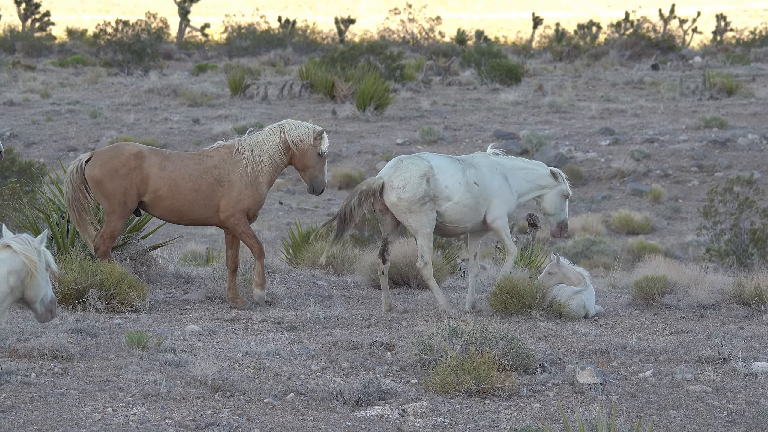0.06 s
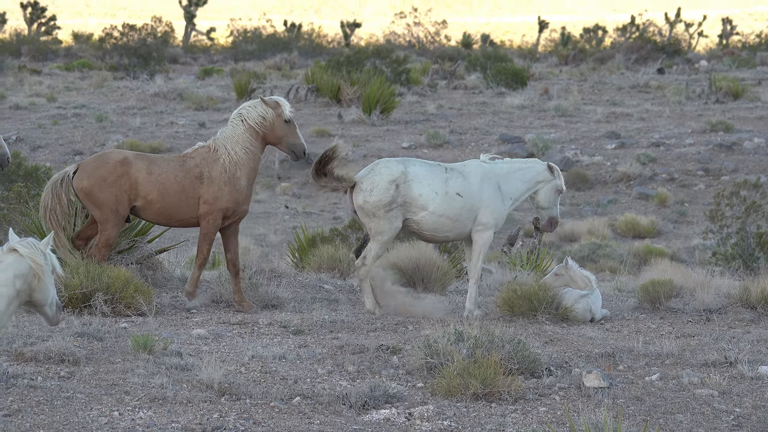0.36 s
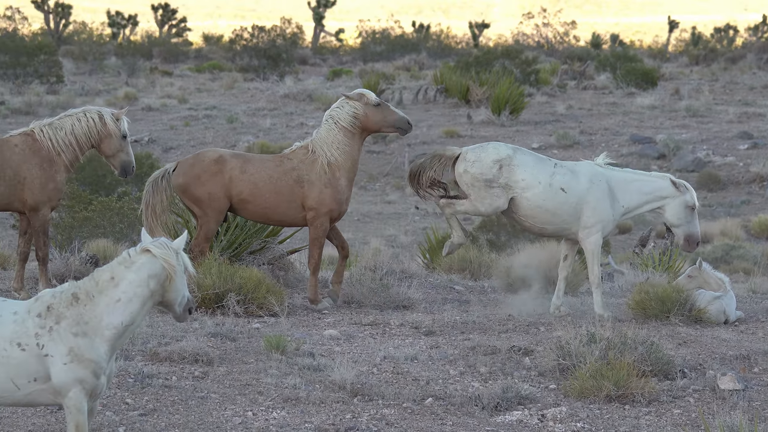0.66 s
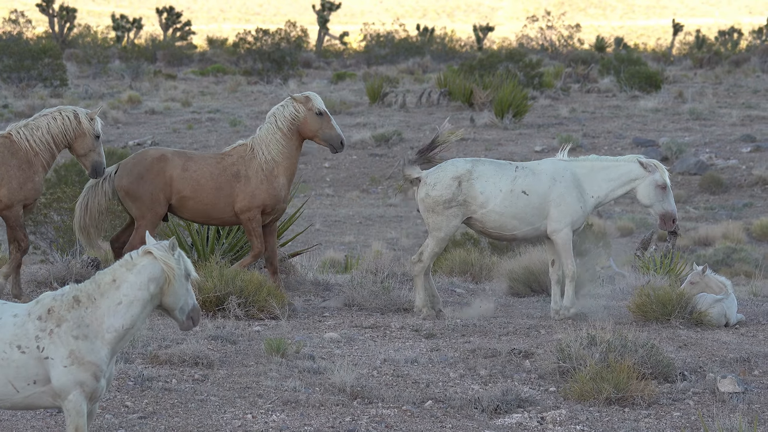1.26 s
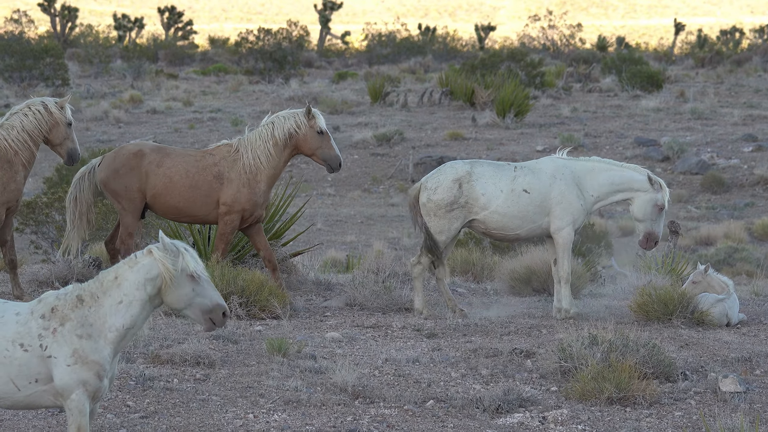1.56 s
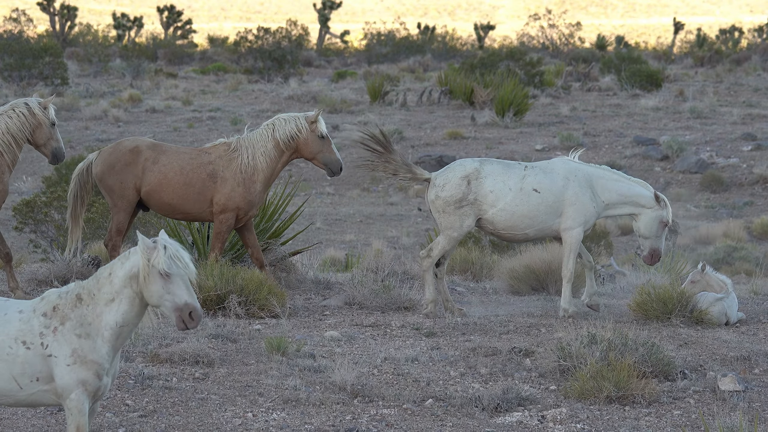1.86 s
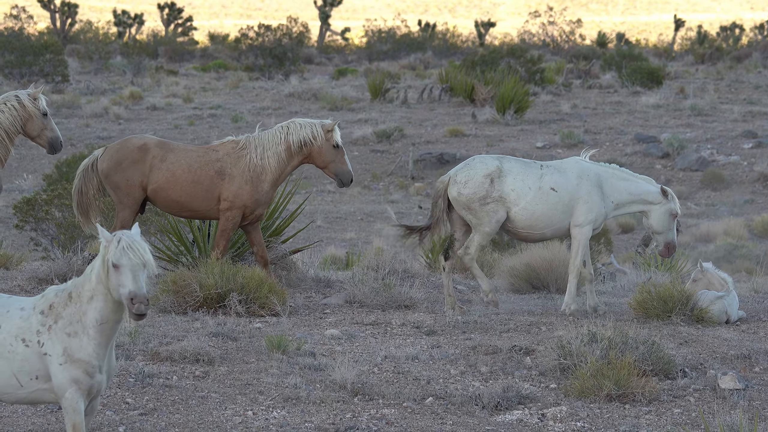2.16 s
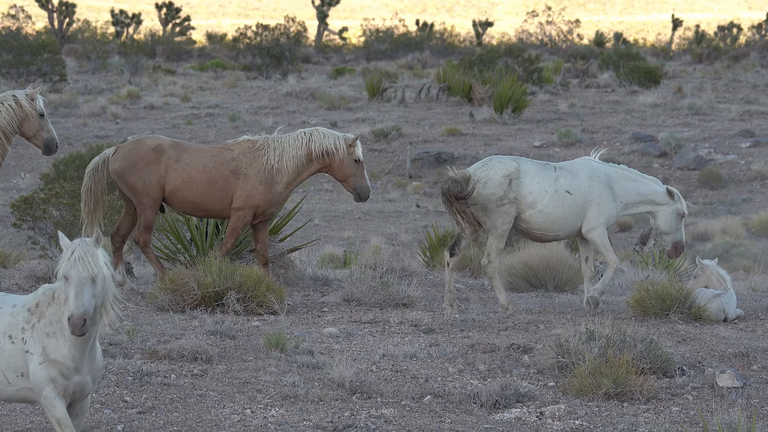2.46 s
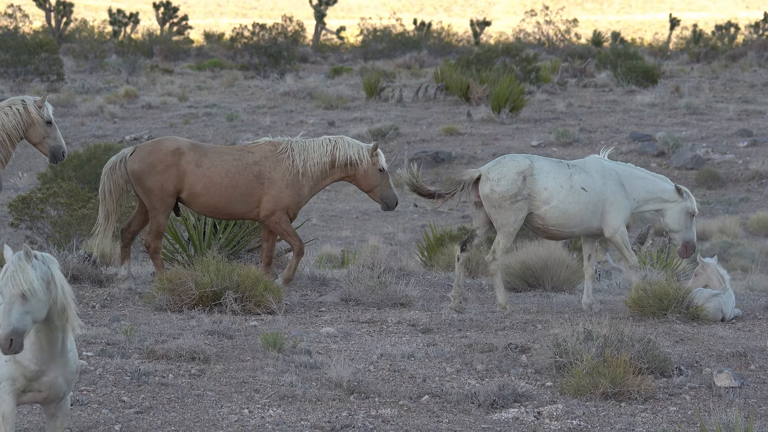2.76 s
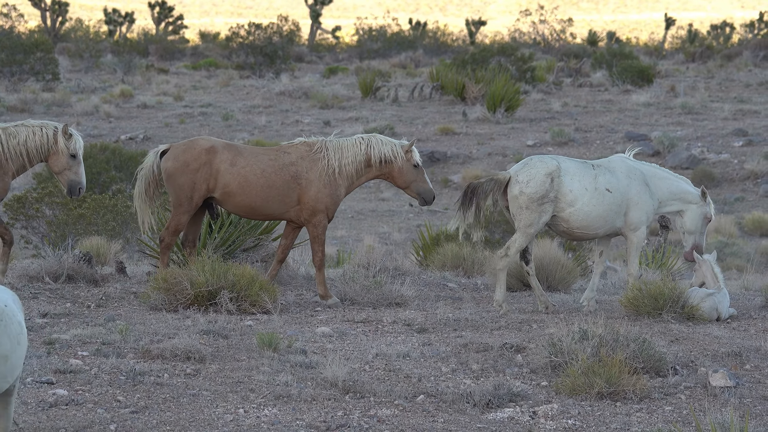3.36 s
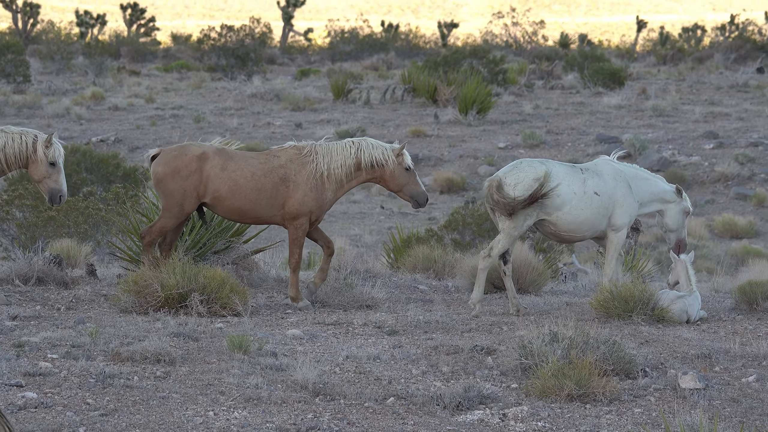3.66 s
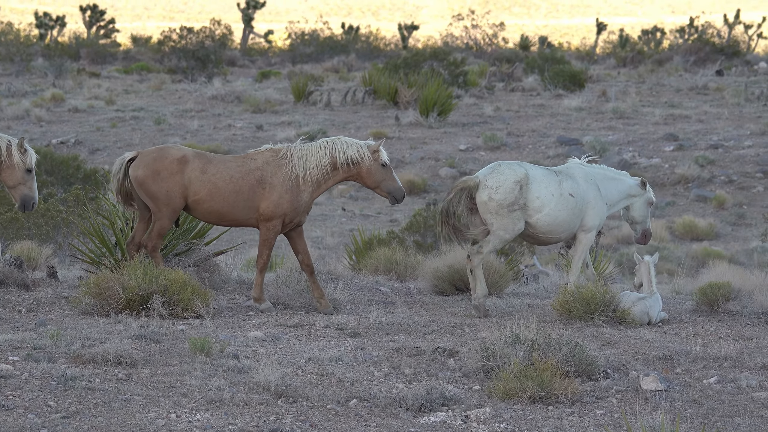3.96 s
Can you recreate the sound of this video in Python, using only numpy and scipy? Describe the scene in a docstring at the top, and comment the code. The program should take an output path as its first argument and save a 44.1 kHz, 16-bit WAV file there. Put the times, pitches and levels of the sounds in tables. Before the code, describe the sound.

A horse's wavering, raspy squeal outdoors, with wind buffeting the microphone and faint hoof scuffs.

```python
"""Open desert, a stereo microphone in the wind; some way off, a horse kicks out at another and squeals.
The squeal starts as a thin whistle, breaks into a harsh rasp as fluttering breath rings the throat,
swoops three times and drops away. Right at the microphone, eddies of wind thump across the ports.
Hooves scuff the gravel faintly over a low rumble and a fading hiss."""
import sys
import numpy as np
from scipy import signal
from scipy.fft import rfft, irfft
from scipy.io import wavfile
from scipy.ndimage import uniform_filter1d, map_coordinates

SR = 44100
rng = np.random.default_rng(int(sys.argv[2]) if len(sys.argv) > 2 else 0)


def waveform_to_disk(signal):
    """Save audio, clipped to [-1, 1], as 16-bit WAV at the path in sys.argv[1]."""
    frames = np.transpose(np.atleast_2d(signal))
    scaled = np.clip(frames, -1, 1) * 32767
    samples = np.round(scaled).astype(np.int16)
    wavfile.write(sys.argv[1], SR, samples)


N = 176400  # 4 s

# Eddies passing the microphone. Each row: time in seconds, delay of the left port and lead of the
# right in seconds taken together, pitch of the small eddies in Hz.
EDDY_PASSAGE = [(0, 0.00038, 176), (1.4, 0.00036, 171), (1.799, 0.00042, 265), (2.9, 0.00033, 274),
                (4, 0.00039, 187)]


def from_db(db):
    """Decibels to amplitude."""
    return 10 ** (np.asarray(db) / 20)


def unit_rms(x):
    """The signal scaled to an rms of 1."""
    return x / np.sqrt(np.mean(x ** 2) + 1e-20)


def curves(rows):
    """One curve per column after the time in seconds, joined by straight lines."""
    times, *columns = np.transpose(rows)
    return [np.interp(np.arange(N) / SR, times, column) for column in columns]


def drift(rate_hz):
    """A smooth random wander with an rms of 1."""
    pole = np.exp(-2 * np.pi * rate_hz / SR)
    return unit_rms(signal.lfilter([1], [1, -2 * pole, pole * pole], rng.standard_normal(N + SR))[SR:])


def resonate(x, hz, width_hz):
    """A steep resonance: two poles, applied twice."""
    radius = np.exp(-np.pi * width_hz / SR)
    section = [1 - radius, 0, radius - 1, 1, -2 * radius * np.cos(2 * np.pi * hz / SR), radius ** 2]
    return signal.sosfilt([section, section], x)


def coloured_noise(spectrum, correlation):
    """Stereo noise of a given colour and likeness between left and right; rms 1."""
    hz, db = np.transpose(spectrum)
    bin_hz = np.arange(N // 2 + 1) * SR / N
    gain = from_db(np.interp(np.log(bin_hz + 1), np.log(hz), db))
    mid, side = irfft(rfft(rng.standard_normal((2, N))) * gain, N)
    return unit_rms(np.sqrt(1 + correlation) * mid + np.sqrt(1 - correlation) * side * [[1], [-1]])


def air():
    """All around the microphone, a low steady rumble and a hiss that dies down."""
    # Colours of the two noises. Each row: frequency in Hz, relative density in dB.
    rumble_spectrum = [(18, -50), (32, -6), (102, 1), (187, 3.5), (591, -23), (1200, -30), (15500, -45.5)]
    hiss_spectrum = [(530, 6.5), (950, 3.5), (3420, -3), (15500, -9)]
    # The fading hiss. Each row: time in seconds, level in dB.
    hiss_level = [(0, -56), (.8, -57.5), (1.5, -61), (2.2, -63), (2.9, -65), (3.3, -69.5), (4, -71.5)]
    rumble = from_db(-63) * coloured_noise(rumble_spectrum, correlation=0.24)
    hiss = from_db(curves(hiss_level)[0]) * coloured_noise(hiss_spectrum, correlation=0.024)
    return rumble + hiss


def add_eddy(pressure, centre_s, db, hz):
    """One eddy crosses a port: a dip in pressure between two shoulders."""
    span = np.arange(max(int((centre_s - 2 / hz) * SR), 0), min(int((centre_s + 2 / hz) * SR), N))
    offset_squared = 0.41 * (np.pi * hz * (span / SR - centre_s)) ** 2
    pressure[span] -= from_db(db) * (1 - 5 * offset_squared) / (1 + offset_squared) ** 4


def breeze(eddies_per_s=240, spread_db=2.5):
    """Small eddies reach the microphone at random, each with a size and strength of its own."""
    # Strength of the small eddies. Each row: time in seconds, level in dB.
    strength = [(0, -26.5), (.33, -60), (.72, -48), (1.04, -58), (1.3, -50.5), (1.52, -68), (1.82, -41),
                (2.1, -43.5), (2.38, -38), (2.55, -46), (2.8, -39), (3.1, -51), (3.5, -61), (3.8, -53.5),
                (4, -66)]
    level_db, pitch_hz = curves(strength)[0], curves(EDDY_PASSAGE)[1]
    pressure = np.zeros(N)
    arrivals = np.flatnonzero(rng.random(N) < eddies_per_s / SR)
    chances = np.clip(rng.standard_normal((len(arrivals), 2)), -2, 2)
    for i, (louder, higher) in zip(arrivals, chances):
        add_eddy(pressure, i / SR, level_db[i] + spread_db * louder, pitch_hz[i] * np.exp(.35 * higher))
    return pressure


def buffets(gap_s=0.0062, run_loss_db=2.5):
    """Each buffet is one eddy or a short uneven run of them that weakens as it goes."""
    # Wind buffets. Each row: start in seconds, first eddy's peak in dB, length in seconds, pitch in Hz.
    runs = [(0.049, -19.5, .02, 198), (0.087, -26, 0.0039, 211), (0.124, -25, .002, 248),
            (0.161, -22, 0.0048, 312), (0.168, -17, 0.0044, 287), (0.206, -27, .026, 194),
            (0.245, -23, .002, 167), (0.273, -34, .002, 151), (.465, -42.5, .025, 138),
            (0.614, -34.5, 0.044, 195), (0.958, -40, 0.011, 138), (1.119, -42.5, 0.036, 222),
            (1.221, -33.5, 0.0046, 160), (1.375, -42.5, 0.053, 170), (1.463, -41.5, .002, 160.9),
            (1.707, -36.5, .002, 197), (1.801, -26, 0.00093, 467), (1.822, -25.5, 0.0051, 320),
            (1.839, -22.5, 0.0091, 223), (1.866, -23, 0.00088, 350), (1.898, -40.5, 0.061, 313),
            (2.02, -29, 0.002, 270), (2.067, -33, .001, 280), (2.188, -33.5, 0.0023, 360),
            (2.226, -31, 0.021, 320), (2.275, -27.5, 0.0026, 367), (2.327, -33, 0.0042, 275),
            (2.367, -32, 0.058, 253), (2.451, -29, 0.0092, 288), (2.514, -36, 0.026, 268),
            (2.601, -33, 0.011, 257), (2.648, -38.5, 0.011, 434), (2.747, -28.5, .001, 340),
            (2.8, -29.5, 0.066, 302), (2.928, -38.5, 0.072, 289.6), (3.039, -38.5, 0.0099, 240),
            (3.095, -39.5, .001, 259), (3.149, -41, .025, 250), (3.399, -39.5, 0.0093, 214),
            (3.591, -41.5, .002, 211), (3.742, -43.5, 0.004, 196), (3.889, -37.5, .001, 275),
            (3.93, -40.5, .002, 262)]
    pressure = np.zeros(N)
    for start, db, length, hz in runs:
        add_eddy(pressure, start, db, hz)
        count = int(round(length / gap_s))
        for k, (later, louder, higher) in enumerate(rng.standard_normal((count, 3)), 1):
            along = (k + 0.189 * later) / count
            eddy_db = db - run_loss_db * along + louder
            add_eddy(pressure, start + length * along, eddy_db, hz * np.exp(.18 * higher))
    return pressure


def wind(low_cut_hz=117.7):
    """Eddies thump the right port, then the left, with fine turbulence where pressure changes fast."""
    t = np.arange(N) / SR
    eddies = buffets() + breeze()
    slope_power = uniform_filter1d(np.gradient(eddies) ** 2, SR // 200)  # 5 ms average
    shear = np.sqrt(np.abs(slope_power)) * SR / (2 * np.pi * 300)
    turbulence = unit_rms(resonate(rng.standard_normal(N), hz=746, width_hz=537))
    pressure = eddies + from_db(-14.5) * shear * turbulence
    delay_s = curves(EDDY_PASSAGE)[0] * (1 + .2 * drift(13))
    ports = [from_db(side) * np.interp(t - side * delay_s, t, pressure) for side in (.5, -.5)]
    return signal.sosfilt(signal.butter(2, low_cut_hz, "high", fs=SR, output="sos"), ports)


def squeal(flutter_hz=381, rest_pitch_hz=1410, shimmer_db=2.5, tear_db=1.8, fade_s=0.011):
    """A whistle with one partial per register; as it breaks up, they slip and flutter rings the throat."""
    # Pitch of the whistle. Each row: time in seconds, pitch in Hz.
    melody = [(0.173, 929), (.2, 985), (0.236, 1417), (0.286, 1346), (.315, 1434), (0.376, 1368),
              (.42, 1421), (0.5, 1445), (0.552, 1374), (0.594, 1400), (0.657, 1252), (.69, 1323),
              (.715, 1460), (0.74, 1280), (0.776, 1443), (0.804, 1478), (.822, 1383), (0.848, 988.7),
              (0.87, 978.5), (0.951, 1130), (.98, 1252), (1.005, 1498), (1.024, 1491), (1.049, 1321),
              (1.07, 1303), (1.105, 1442), (1.13, 1458), (1.149, 1009), (1.175, 1081), (1.205, 1324),
              (1.228, 1386), (1.261, 1151), (1.299, 1039), (1.351, 1146), (1.372, 1060), (1.41, 794)]
    # How far the voice breaks up. Each row: time in seconds, then roughness from 0 to 1 of the low,
    # middle and high registers.
    roughness = [(.21, 0.76, 0.53, 0.68), (.25, .04, 1, 0.8), (.38, 0.023, 0.078, 0.29),
                 (.46, 0.014, 0.16, 0.22), (.53, 0.98, 0.47, 1), (.6, 0.97, 0.43, 0.85),
                 (.66, .87, 0.069, 1), (.72, 0.95, .85, 0.51), (.755, 0.97, 0.22, 1), (.8, 1, 1, 0.12),
                 (.845, 0.11, 0.17, 0.98), (.91, 0.31, 0.99, 1), (.97, 0.027, 0.97, 0.72),
                 (1.02, .03, 0.95, 0.025), (1.065, 0.39, .08, 0.17), (1.11, 0.31, .6, .2),
                 (1.15, 0.83, 1, 1), (1.235, 0.19, 0.36, 0.67), (1.28, 0.51, 0.77, .75),
                 (1.345, 0.036, 0.069, 0.35), (1.39, 0.67, 0.73, 1)]
    # Strength of the voice. Each row: time in seconds, then low, middle, high and top registers in dB.
    register_levels = [(0.18, -57, -63, -66, -76), (0.22, -56, -59, -58, -65), (0.26, -60.5, -74, -70, -77),
                       (0.33, -62, -69, -78, -80), (0.37, -55.5, -65, -70, -81),
                       (0.48, -57, -59.5, -56.5, -82), (0.55, -53, -47.5, -46.5, -63.5),
                       (0.65, -50.5, -40.5, -46.5, -51.5), (0.72, -58.5, -53, -48, -59.5),
                       (0.752, -54, -43, -47.5, -60), (0.795, -71, -61, -44.5, -63),
                       (0.833, -52, -42.5, -44.5, -60), (0.852, -38.5, -59, -54, -57),
                       (0.875, -57.5, -61, -68, -76), (0.92, -52.5, -53.5, -49.5, -54),
                       (0.95, -50, -58, -61, -65), (0.975, -49, -54.5, -61, -63),
                       (1.003, -60, -54.5, -69, -81), (1.022, -60, -59, -45, -70),
                       (1.04, -63, -64, -63, -74), (1.058, -54.5, -49.5, -50, -65),
                       (1.11, -59, -59, -47, -59), (1.16, -45.5, -54, -58, -62),
                       (1.19, -51.5, -50, -53.5, -49), (1.22, -66, -57.5, -51, -58),
                       (1.255, -52, -51.5, -50.5, -50), (1.3, -51, -61, -67, -84),
                       (1.352, -45.5, -43.5, -55.5, -60), (1.385, -48.5, -58, -59.5, -67),
                       (1.41, -58, -60, -81, -76)]
    # Throat resonances, a group per register. Each entry: centre in Hz, width in Hz, gain in dB.
    throat = [
        [(1051, 214, 4), (1370, 310, -7.5)],
        [(2034, 220, -1.5), (2338, 180, -0.5), (2653, 63, 1)],
        [(3750, 360, 5), (4443, 170, 5)],
        [(5180, 720, 5), (6010, 330, -2)],
    ]
    # Sizzle above the top register. Each row: time in seconds, level in dB.
    sizzle_level = [(.47, -79), (.565, -59), (.7, -72), (.84, -68.5), (1.0, -82), (1.08, -63), (1.25, -68),
                    (1.29, -77)]

    low, middle, high = np.clip(curves(roughness), 0, 1)
    rasp_shares = [low, middle, high, np.maximum(high, 0.81)]  # the top is always breathy
    harshness = np.minimum(middle, high)
    glide_hz = curves(melody)[0]
    pitch_hz = glide_hz * (1 + .005 * drift(48) + .028 * harshness * drift(276))
    phase = 2 * np.pi * np.cumsum(pitch_hz) / SR
    flutter_rate = flutter_hz * (1 + 0.112 * drift(140))
    flutter = np.cos(2 * np.pi * np.cumsum(flutter_rate) / SR)
    puffs = (1 + flutter) * rng.standard_normal(N)
    # Read at a varying speed, the resonances rise and sink a little with the pitch.
    throat_clock = np.cumsum((glide_hz / rest_pitch_hz) ** .1 * (1 + .005 * drift(55)))
    sizzle = resonate(puffs, hz=7940, width_hz=780) + .5 * resonate(puffs, hz=9230, width_hz=780)
    voice = from_db(curves(sizzle_level)[0]) * map_coordinates(unit_rms(sizzle), [throat_clock])

    gains = from_db(curves(register_levels))
    for harmonic, (gain, share, resonances) in enumerate(zip(gains, rasp_shares, throat), 1):
        slip = .4 * share * drift(flutter_hz)
        tone = np.sqrt(2 - 2 * share) * np.sin(harmonic * phase + slip)
        tone *= from_db(shimmer_db * np.sqrt(share) * drift(83))
        tone *= 1 + 0.39 * harshness * flutter
        ringing = sum(from_db(db) * unit_rms(resonate(puffs, hz, width)) for hz, width, db in resonances)
        rasp = np.sqrt(share) * map_coordinates(unit_rms(ringing), [throat_clock])
        rasp *= from_db(tear_db * drift(55))
        voice += gain * from_db(-1.5) * (tone + rasp)
    t = np.arange(N) / SR
    start, end = melody[0][0], melody[-1][0]
    return voice * np.clip(np.minimum(t - start, end - t) / fade_s, 0, 1)


def across_desert(voice, right_bias_db=2, scatter_db=-14.5, t60_s=0.19, cutoff_hz=3400):
    """Some way off, slightly right: the direct sound and a short dull scatter from ground and scrub."""
    t = np.arange(N) / SR
    dull = signal.butter(2, cutoff_hz, fs=SR, output="sos")
    scatter = signal.sosfilt(dull, rng.standard_normal((2, SR // 2)))
    scatter *= from_db(-60 * t[:SR // 2] / t60_s)
    scatter /= np.sqrt(np.sum(scatter ** 2, axis=1, keepdims=True))
    echo = signal.fftconvolve(voice[None], scatter, axes=1)[:, :N]
    left = from_db(-right_bias_db / 2) * voice
    right = from_db(right_bias_db / 2) * np.interp(t - .00001, t, voice)
    return np.array([left, right]) + from_db(scatter_db) * echo


def hoof_scuffs():
    """Hooves scuff gravel and brush: faint, brief swells of gritty noise."""
    # Scuffs. Each row: peak time in seconds, level in dB, half-width in seconds, band centre in Hz.
    scuffs = [(0.276, -58.5, 0.02, 6060), (1.132, -44, 0.014, 1900), (1.371, -47, 0.0045, 6900),
              (1.914, -50.5, 0.0016, 4500), (2.187, -64, 0.088, 10900), (2.188, -55, 0.0032, 1930),
              (2.241, -53.5, 0.0035, 1860), (2.301, -62, 0.022, 5470), (2.753, -50.5, 0.0017, 1330),
              (3.23, -68, 0.029, 2418), (3.877, -60, 0.0013, 4950)]
    out, t = np.zeros((2, N)), np.arange(N) / SR
    grit = rng.standard_normal(N) + 1.76 * rng.standard_normal((2, N))  # centre plus wide
    grit *= from_db(drift(270))
    for peak_s, db, half_width_s, hz in scuffs:
        band = signal.butter(2, [hz * 0.41, min(hz * 1.43, SR * 4 / 9)], "band", fs=SR, output="sos")
        swell = np.exp(-((t - peak_s) / half_width_s) ** 2)
        out += from_db(db) * swell * unit_rms(signal.sosfilt(band, grit))
    return out


def scene():
    """Desert air, the horses at a distance and wind on the microphone."""
    return air() + across_desert(squeal()) + hoof_scuffs() + wind()


def record(dry):
    """The microphone's wind filter takes the deep bass; the top is cut steeply."""
    low_cut = signal.butter(2, 45, "high", fs=SR, output="sos")
    high_cut = signal.ellip(10, .1, 70, 15750, fs=SR, output="sos")
    return signal.sosfilt(high_cut, signal.sosfilt(low_cut, dry))


dry = scene()
out = record(dry)
waveform_to_disk(out)
```